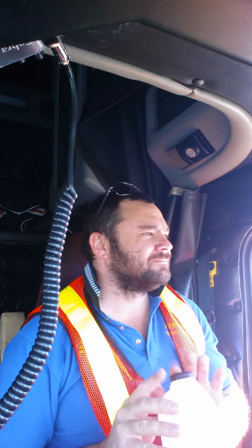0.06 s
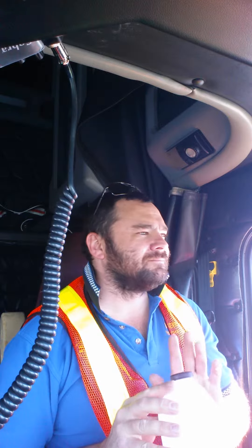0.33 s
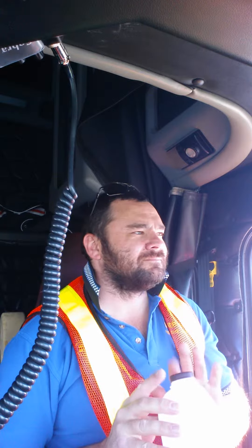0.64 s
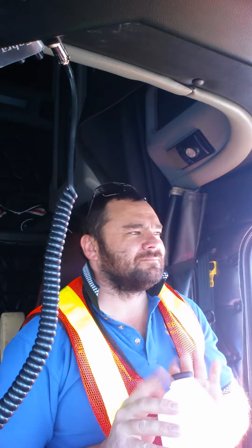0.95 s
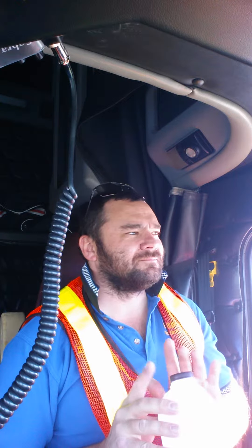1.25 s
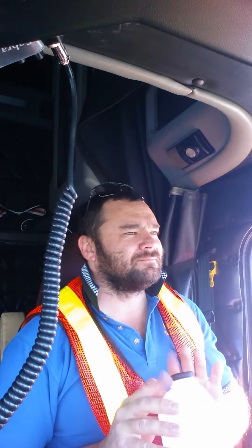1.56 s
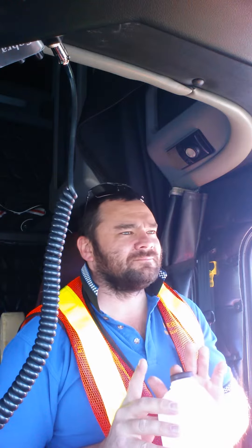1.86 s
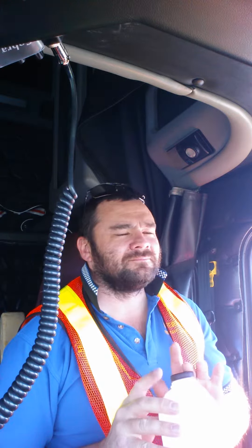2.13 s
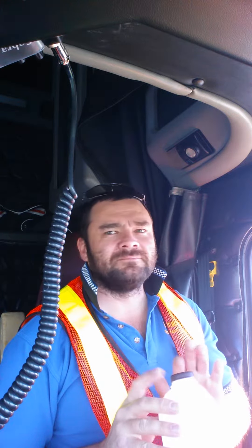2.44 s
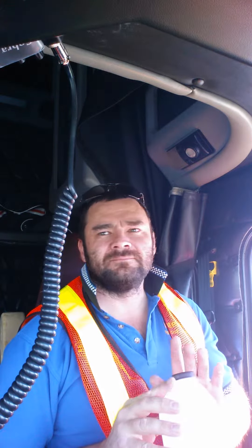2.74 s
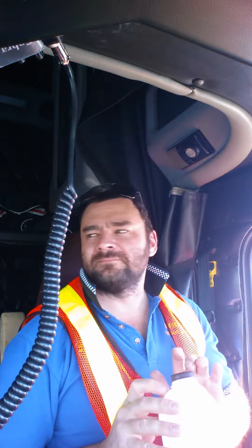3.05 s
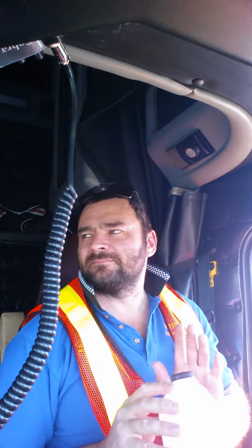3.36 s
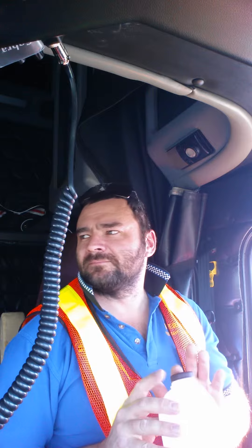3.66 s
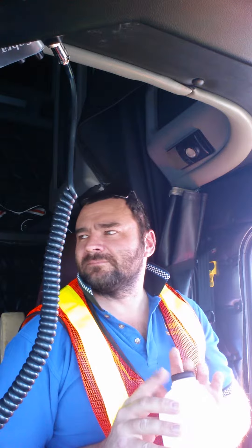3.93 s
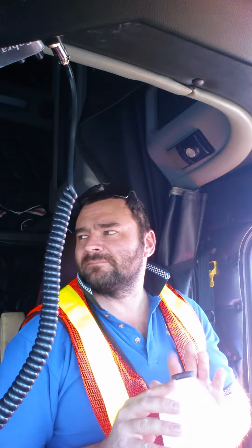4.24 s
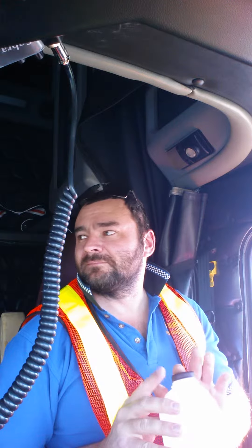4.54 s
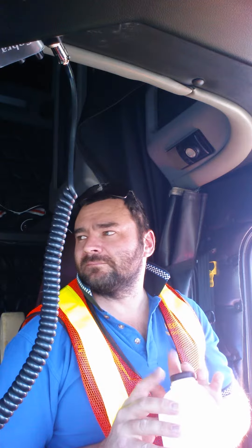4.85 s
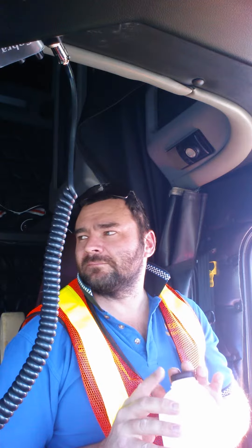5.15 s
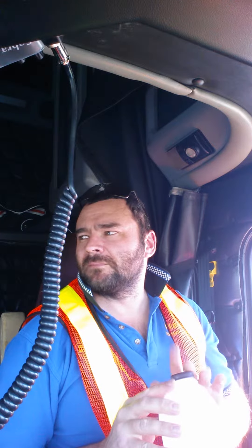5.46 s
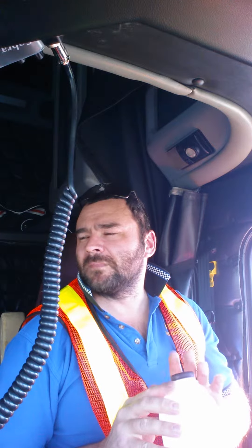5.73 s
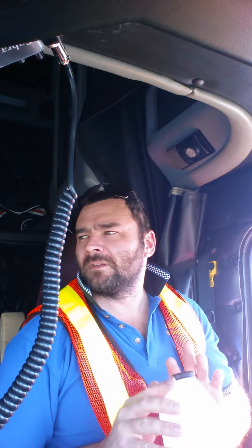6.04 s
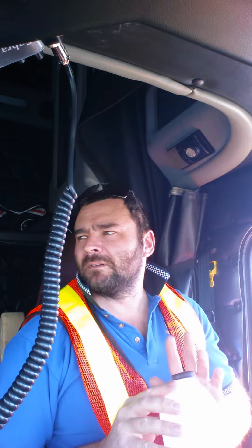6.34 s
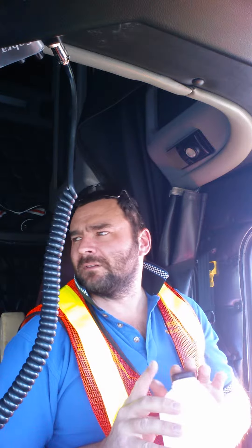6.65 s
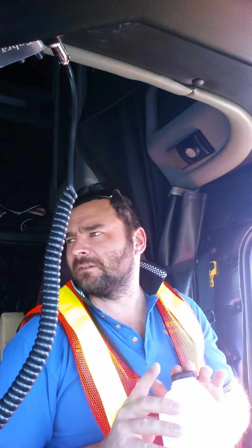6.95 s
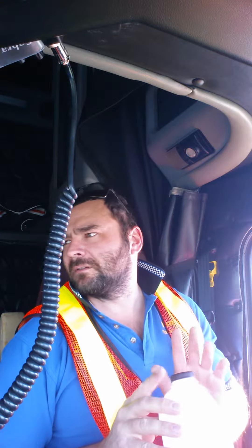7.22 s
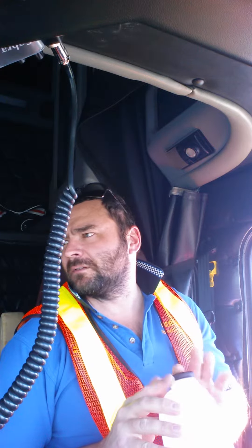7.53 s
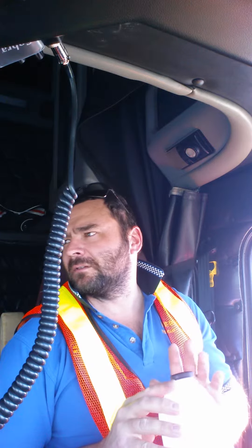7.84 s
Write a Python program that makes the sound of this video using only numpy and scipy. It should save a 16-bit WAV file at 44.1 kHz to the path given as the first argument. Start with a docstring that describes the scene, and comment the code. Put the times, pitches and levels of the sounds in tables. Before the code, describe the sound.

Fingers drum a loose rhythm on a hollow plastic jug, close up, over a faint low hum in a truck cab.

```python
"""Drumming on a jug in a lorry cab

Fingers drum a loose rhythm on a hollow plastic jug in a parked lorry cab, close to a phone's microphones.
Each tap ticks and knocks on the shell, then the walls ring and the air of the cab booms briefly.
Behind the jug lie a slowly beating low hum and a soft hiss."""
import sys
import numpy as np
from scipy import signal
from scipy.fft import rfft, irfft, next_fast_len
from scipy.io import wavfile
from scipy.ndimage import uniform_filter1d

SR = 44100
rng = np.random.default_rng(int(sys.argv[2]) if len(sys.argv) > 2 else 0)


def put_to_file(sound):
    """Save the sound as 16-bit audio at rate SR, in the file named by the first command-line argument."""
    columns = np.atleast_2d(sound).T  # one column per channel
    safe = np.clip(columns, -1, 1)
    whole_steps = np.round(safe * 32767)
    wavfile.write(sys.argv[1], SR, whole_steps.astype(np.int16))


N = 352359
TAP_TIME = np.arange(int(.6 * SR)) / SR  # seconds since the finger lands

# Finger taps on the jug: start_s, stroke, strength_db, nail_db (relative to strength)
TAPS = [(0.0417, "dry", -46, 14.5), (0.177, "hollow", -32.5, 0), (0.3048, "low", -36.5, 11.5),
        (0.5451, "stiff", -15.5, -3), (0.772, "stiff", -45, -2), (0.8339, "dry", -39.5, 6.5),
        (0.931, "stiff", -37.5, -1.5), (0.991, "flick", -39.5, 7.5), (1.066, "stiff", -26.5, -8.5),
        (1.0778, "hollow", -32.5, 12), (1.1237, "dry", -42, 9), (1.4589, "hollow", -29, -2),
        (1.572, "stiff", -39.5, 5.5), (1.6062, "dry", -51.5, 13), (1.6833, "hollow", -30, -2.5),
        (1.9684, "hollow", -28, 2.5), (2.0889, "hollow", -28, 13), (2.1804, "hollow", -30.5, -5),
        (2.319, "dry", -45.5, 16), (2.4507, "low", -32.5, 2), (2.591, "flick", -32.5, 11),
        (2.6163, "flick", -35, 1.5), (2.805, "dry", -42.5, 13.5), (2.9157, "hollow", -30, -4),
        (3.0176, "dry", -45, 3.5), (3.0554, "dry", -57, 16), (3.3456, "stiff", -45.5, 10.5),
        (3.5725, "stiff", -14.5, -4.5), (3.818, "flick", -38.5, 10), (3.936, "low", -41, 3),
        (4.0783, "low", -36.5, 9), (4.1993, "hollow", -31, -1), (4.3306, "low", -35, 14),
        (4.5873, "stiff", -16, 0), (4.807, "low", -39, 10.5), (4.911, "low", -38.5, 0.5),
        (4.9857, "dry", -40, 2.5), (5.077, "flick", -32, 11.5), (5.268, "stiff", -50.5, -6),
        (5.315, "low", -36, 11.5), (5.5635, "hollow", -28.5, 3.5), (5.5897, "stiff", -17.5, -2.5),
        (5.819, "flick", -35.5, 11), (5.9655, "low", -33, -1), (6.02, "low", -43, 4.5),
        (6.0778, "dry", -42, 13.5), (6.2157, "low", -32, -2), (6.278, "low", -39, 2),
        (6.346, "low", -32, 11), (6.5834, "stiff", -14.5, -11.5), (6.6019, "stiff", -16.5, -1.5),
        (6.8415, "flick", -33.5, 13), (6.9681, "hollow", -29.5, -5), (7.0316, "low", -33, 0),
        (7.1292, "stiff", -26, 7.5), (7.374, "flick", -35, 11.5), (7.6225, "stiff", -16.5, -3),
        (7.8894, "flick", -34.5, 10)]
# How the jug answers: stiff accent, hollow ring, low note, nail flick over the low note, dry click.
# By stroke: knock_db, upper_wall_db, lower_wall_db, thump_db (these four relative to strength),
# scatter_db (relative to knock), cab_db (relative to thump), lower_wall_shift_hz
STROKES = {"stiff": (-0.5, -6.5, -8.5, -2.5, -10.5, -1, 8.5), "hollow": (0.5, 2, 3.5, 8.5, -10, -1, 11),
           "low": (0.5, -9.5, 3, 7.5, -7, 0.5, -12.5), "flick": (-2.5, -5, 5, 7.5, -4.5, 0, -7.5),
           "dry": (-1.5, -3.5, -4, 6, -0.5, 2.5, -13)}
# The jug at the phone's two microphone ports: frequency_hz, left_minus_right_db
PORT_BALANCE = [(150, -2.5), (280, 0.5), (430, -8), (560, -8.5), (800, 5), (1300, -4), (1900, -4.5),
                (2800, 2.5), (4700, -0.5), (6500, -7.5), (9000, -10.5), (14000, -17.5)]


def jug(shell_db=5.5, walls_db=-1, port_lag_s=.00008):
    """Fingers tap the jug close to the phone; the sound reaches the left port just before the right."""
    out = np.zeros((2, N + 2 * len(TAP_TIME)))
    shell = noise(TICK_COLOUR, len(TAP_TIME))  # dense high modes, shared by all taps
    paths = noise(TICK_COLOUR, len(TAP_TIME))  # their reflections
    for start_s, stroke, strength_db, nail_db in TAPS:
        knock_db, upper_db, lower_db, thump_db, scatter_db, cab_db, shift_hz = STROKES[stroke]
        start = int(start_s * SR)
        contact = nail_tick(shell, paths, nail_db) + undb(knock_db + shell_db) * shell_knock(scatter_db)
        walls = undb(walls_db) * wall_ring(upper_db, lower_db, thump_db, shift_hz)
        boom = undb(thump_db + cab_db) * cab_boom()
        out[:, start:start + len(TAP_TIME)] += undb(strength_db) * (contact + walls + boom)
    size = next_fast_len(out.shape[1])
    hz = np.fft.rfftfreq(size, 1 / SR)
    left_gain = np.sqrt(gain_at(PORT_BALANCE, hz))
    ports = np.array([left_gain, np.exp(-2j * np.pi * hz * port_lag_s) / left_gain])
    return irfft(rfft(out, size) * ports, size)[:, :N]


# The contact tick, heard close up: frequency_hz, level_db
TICK_COLOUR = [(950, -42), (1250, -6), (1800, -12), (2250, -1), (2700, -5.5), (3000, 1), (3500, 1),
               (4900, 4.5), (6200, 4), (8500, 3.5), (11000, -7), (15000, -19.5)]
# High shell modes that the nail rings: pitch_hz, level_db
NAIL_MODES = [(1700, -8), (1975, -5.5), (2667, 2), (2850, -4), (3130, -20), (3540, 6), (3950, -19),
              (4500, -7.5), (4790, 4), (5110, 0), (6100, 9), (8340, -23)]


def nail_tick(shell, paths, nail_db, fresh=0.92, top_db=-8.5):
    """Nail and skin crack on the plastic: a direct burst, a brief high ring, then close reflections."""
    size = len(TAP_TIME)
    # each spot of the shell sounds a little different
    colour = [(hz, db + 2.5 * rng.standard_normal()) for hz, db in TICK_COLOUR]
    weights = undb(3 * rng.standard_normal(len(NAIL_MODES))) * rng.choice([-1, 1], len(NAIL_MODES))
    direct = (shell + fresh * noise(colour, size))[0] * fade(t60=0.013) * swell(lag=0, rise=0.00026)
    ring = sum(weight * undb(db) * mode(hz, t60=0.05, lag=0.000496, detune=0.0052)
               for weight, (hz, db) in zip(weights, NAIL_MODES))
    echoes = (paths + fresh * noise(colour, size)) * fade(t60=0.091) * swell(lag=0.00041, rise=0.00017)
    burst = undb(2) * direct + undb(-17.5) * ring + undb(-8) * echoes
    hardness = undb(nail_db) * gain_at([(4500, 0), (8400, top_db)], np.fft.rfftfreq(size, 1 / SR))
    return irfft(rfft(burst) * hardness, size) * (TAP_TIME < TAP_TIME[-1] / 2)


# Stiff shell under the finger; the first, heavily damped mode is the tock: pitch_hz, level_db, t60_s
SHELL_MODES = [(1330, 11, 0.0092), (1205, -1.5, 0.03), (1305, -3, 0.026), (1656, -3.5, 0.025),
               (1940, -21, 0.11)]
# The knock as it comes back from around the cab: frequency_hz, level_db
SCATTER_COLOUR = [(300, -80), (640, 2.5), (740, -6), (980, -10), (1250, -10), (1700, -6.5), (2200, -12.5),
                  (4000, -22), (9000, -60)]


def shell_knock(scatter_db, radiates_above_hz=980):
    """The shell's short tock and its fading modes, then their scatter off the cab's surfaces."""
    ring = sum(undb(db) * mode(hz, t60, lag=0.00064, detune=0.01) for hz, db, t60 in SHELL_MODES)
    ring = ring * swell(lag=.0005, rise=.0014) ** 2
    ring = highpass(ring, radiates_above_hz, order=4)
    scatter = noise(SCATTER_COLOUR, len(TAP_TIME)) * fade(t60=0.085) * swell(lag=.003, rise=.001)
    return undb(-1.5) * ring + undb(scatter_db) * scatter


# Walls and enclosed air of the jug: pitch_hz, level_db, t60_s
WALL_MODES = [(165.2, 2, 0.13), (185.8, -4, 0.11), (212.6, -1, 0.077), (250, -9, 0.11),
              (279.3, -1.5, 0.088), (421.5, 4, 0.086), (453, 3, 0.075), (544.6, 6, 0.094), (663, -5, 0.083)]


def wall_ring(upper_db, lower_db, thump_db, shift_hz):
    """The finger pad pushes the wall in just after first contact; walls and enclosed air ring on."""
    push = [(290, thump_db), (410, lower_db), (520, upper_db)]
    ring = 0
    for hz, db, t60 in WALL_MODES:
        pitch_hz = hz + shift_hz * (400 < hz < 500)  # the stroke retunes only the lower wall ring
        ring -= undb(db) * gain_at(push, hz) * mode(pitch_hz, t60, lag=0.00464, detune=0.018)
    return ring * swell(lag=.004, rise=.0015)


# Low reverberation inside the cab: frequency_hz, level_db
BOOM_COLOUR = [(70, -32), (110, -26), (160, 3), (250, -10), (345, -5), (480, -5.5), (670, -13.5),
               (750, -26), (2000, -49)]
# Standing waves of the cab: pitch_hz, level_db, t60_s
CAB_MODES = [(92.6, -6, 0.56), (121.2, -18, 1), (141.6, -38, 0.36)]


def cab_boom():
    """A thump fills the cab with a short boom; its standing waves build more slowly and last longer."""
    boom = noise(BOOM_COLOUR, len(TAP_TIME))[0] * fade(t60=0.12) * swell(lag=0.0084, rise=0.00044)
    standing = sum(undb(db) * mode(hz, t60, lag=0.0084, detune=0.0084) for hz, db, t60 in CAB_MODES)
    return undb(-9.5) * boom + standing * swell(lag=0.012, rise=0.019)


# Closely spaced tones of the hum in the cab: pitch_hz
HUM_PITCHES = [46.03, 46.5, 48.5, 49.52]
# The same tones, in order: level_db
HUM_LEVELS = [-46.5, -44.5, -41, -46]


def cab_hum(in_phase_s=3.06, flutter_db=2.5):
    """A low drone behind the jug: its tones beat against each other, swelling about twice a second."""
    t = np.arange(N) / SR - in_phase_s
    tones = sum(undb(db) * np.cos(2 * np.pi * hz * t) for hz, db in zip(HUM_PITCHES, HUM_LEVELS))
    return np.sqrt(2) * tones * undb(flutter_db * drift(rate_hz=8))


# Room tone of the parked cab: frequency_hz, relative_density_db
AIR_COLOUR = [(30, -14), (45, -14.5), (64, -17.5), (80, -17), (125, -8.5), (220, -16.5), (300, -25.5),
              (640, -37.5), (750, -35.5), (1350, -44.5), (2850, -48.5), (7300, -48), (13800, -49.5),
              (15000, -57)]


def cab_air(level_db=-41.5, wide_above_hz=900, bass_width=0.019):
    """Steady cab rumble, alike at both microphone ports, under hiss that differs between them."""
    mid, side = noise(AIR_COLOUR, N)
    treble = highpass(side, wide_above_hz, order=1)
    side = treble + bass_width * (side - treble)
    return undb(level_db) * np.array([mid + side, mid - side])


def undb(db):
    """Decibels to gain."""
    return 10 ** (np.asarray(db) / 20)


def gain_at(points, hz):
    """Gain of (frequency_hz, level_db) points, joined on a log-frequency axis."""
    points_hz, db = np.transpose(points)
    return undb(np.interp(np.log(np.maximum(hz, 1)), np.log(points_hz), db))


def highpass(x, hz, order):
    """Butterworth low cut."""
    return signal.sosfilt(signal.butter(order, hz, "high", fs=SR, output="sos"), x)


def noise(colour, size):
    """Two unrelated noises of the given colour, rms 1."""
    hz = np.fft.rfftfreq(size, 1 / SR)
    x = irfft(rfft(rng.standard_normal((2, size))) * gain_at(colour, hz), size)
    return x / x.std()


def fade(t60, lag=0):
    """Exponential decay that starts after lag seconds."""
    return (TAP_TIME >= lag) * np.exp(-np.log(1000) * np.maximum(TAP_TIME - lag, 0) / t60)


def swell(lag, rise):
    """Smooth rise from 0 to 1 that starts after lag seconds."""
    return 1 - np.exp(-np.maximum(TAP_TIME - lag, 0) / rise)


def drift(rate_hz):
    """Slow random drift with a spread near 1."""
    hold = int(SR / rate_hz)
    steps = np.repeat(rng.standard_normal(N // hold + 1), hold)
    return uniform_filter1d(uniform_filter1d(steps, hold), hold)[:N]


def mode(hz, t60, lag, detune):
    """One damped resonance; the grip shifts its pitch a little from tap to tap."""
    hz = hz * (1 + detune * rng.standard_normal())
    return np.sin(2 * np.pi * hz * (TAP_TIME - lag)) * fade(t60, lag)


def scene():
    """The jug up close, over the quiet cab, which sits slightly to the right."""
    return jug() + (cab_hum() + cab_air()) * undb([[-.4], [.4]])


def record(dry, bottom_hz=37, top_hz=14800):
    """The phone drops the deepest bass and cuts the top."""
    top_cut = signal.ellip(8, .2, 70, top_hz, fs=SR, output="sos")
    return signal.sosfilt(top_cut, highpass(dry, bottom_hz, order=6))


dry = scene()
out = record(dry)
put_to_file(out)
```